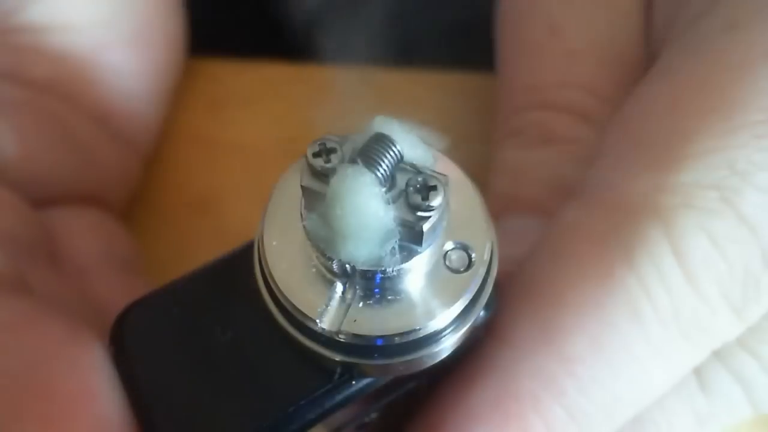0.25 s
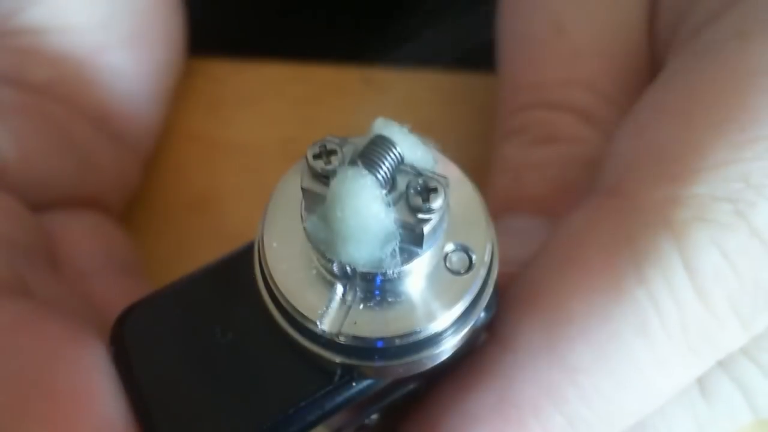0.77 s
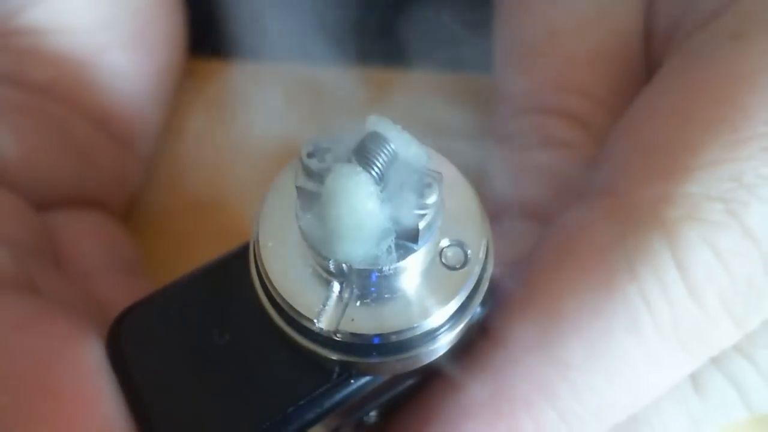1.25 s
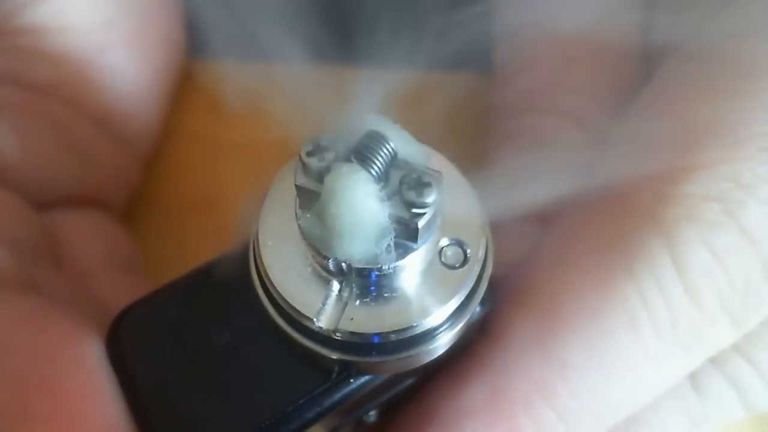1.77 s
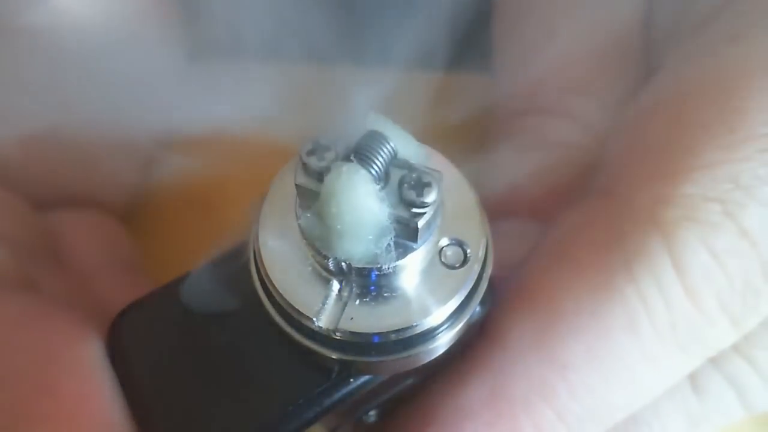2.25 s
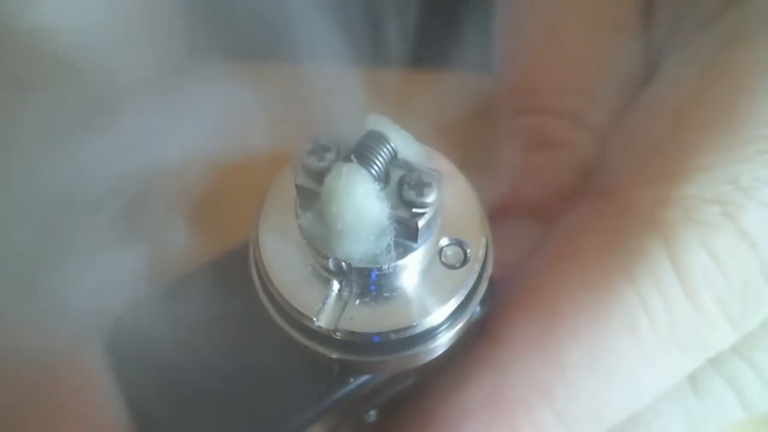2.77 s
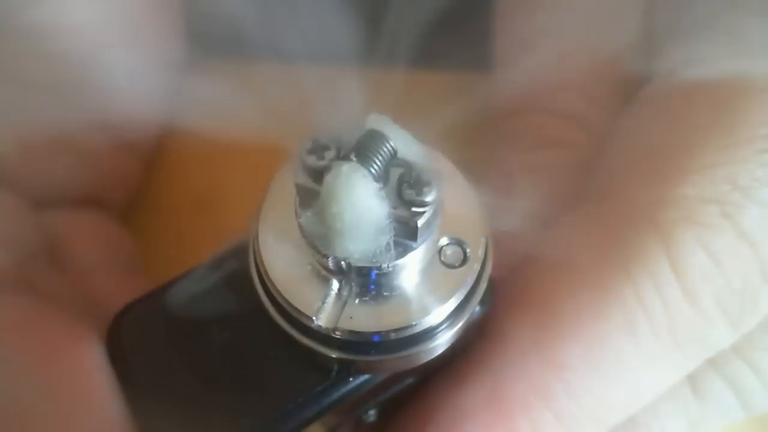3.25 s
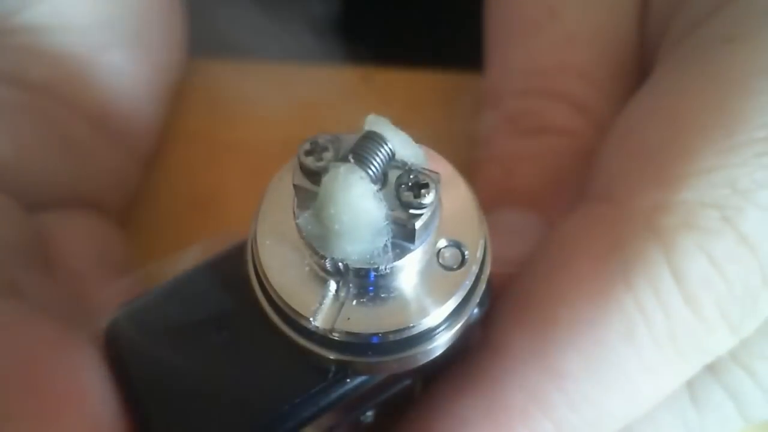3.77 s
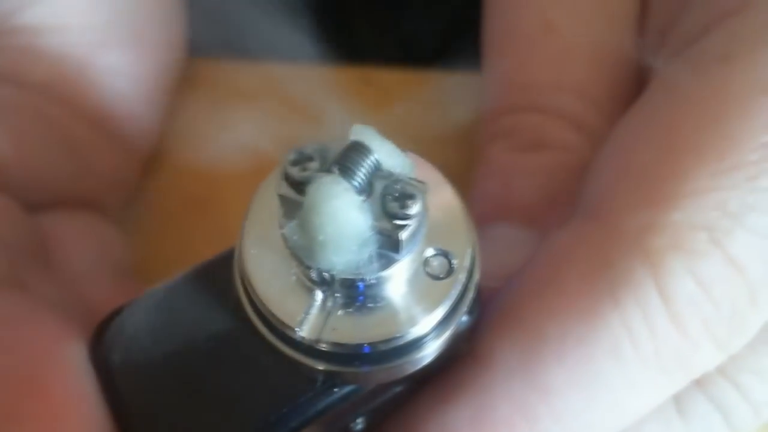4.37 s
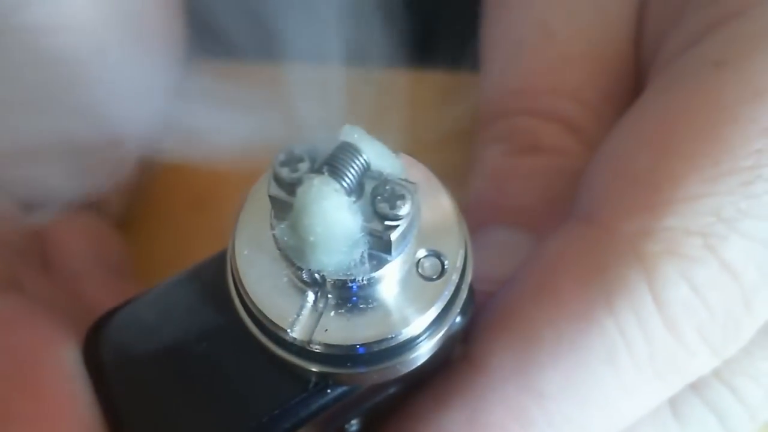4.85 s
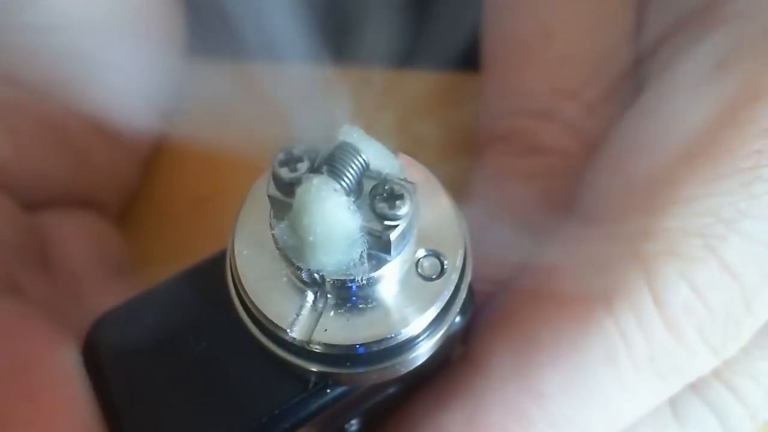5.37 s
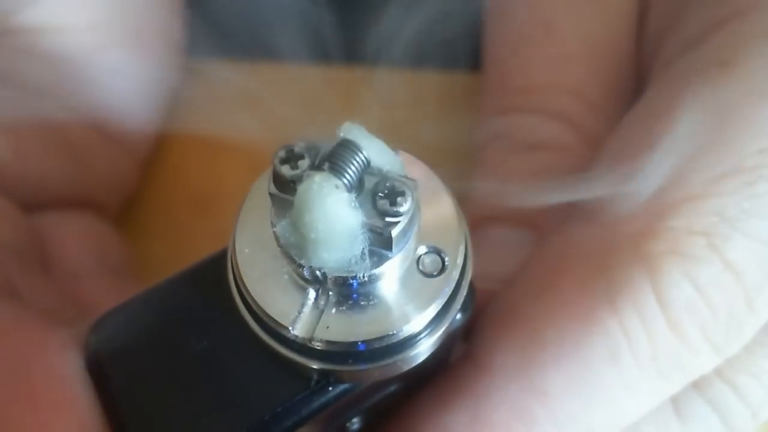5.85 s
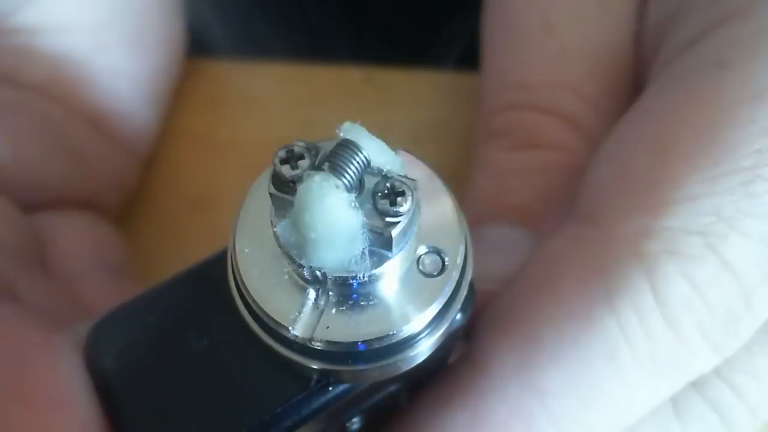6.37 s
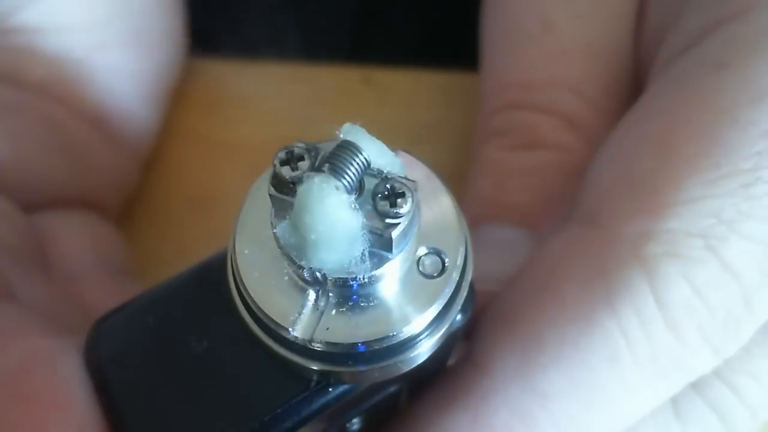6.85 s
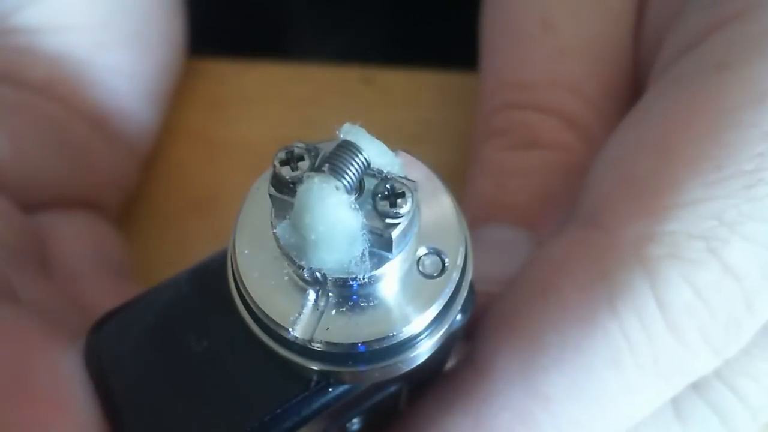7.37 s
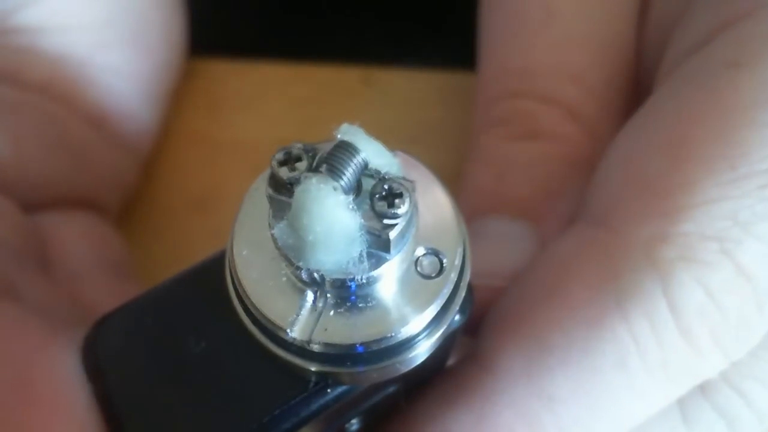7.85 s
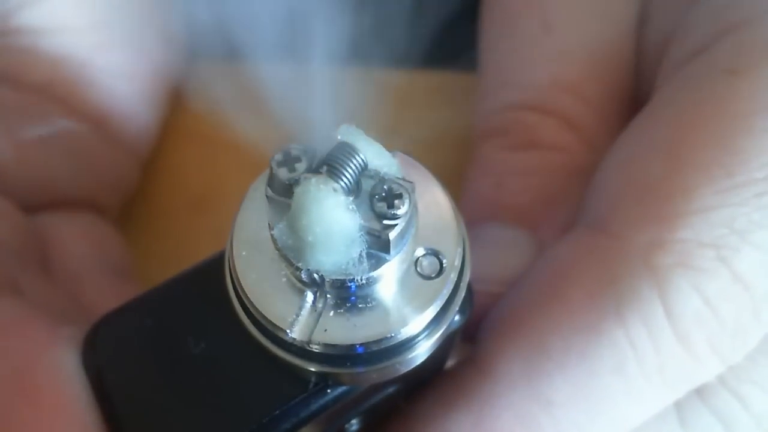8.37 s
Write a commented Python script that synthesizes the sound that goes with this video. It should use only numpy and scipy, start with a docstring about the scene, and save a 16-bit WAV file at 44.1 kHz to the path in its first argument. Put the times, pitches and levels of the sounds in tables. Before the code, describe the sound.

Three times a button clicks and liquid fizzes and crackles on a hot vape coil, close up over faint room hum.

```python
"""Vape coil, fired three times

Close to a phone in a quiet room, each press of the button clicks and the wire heats. Liquid on the
wick fizzes, sputters and spits, then crackles on as the wire cools. Behind it are low room noise,
a fan's hum, a faint pulsing electronic whine and slow stirrings of the air."""
import sys
import numpy as np
from scipy import signal
from scipy.fft import rfft, irfft
from scipy.io import wavfile
from scipy.ndimage import uniform_filter1d

SR = 44100
rng = np.random.default_rng(int(sys.argv[2]) if len(sys.argv) > 2 else 0)


def wav_record(signal):
    """Record a signal, one row per channel, as 16-bit PCM in the file named by sys.argv[1]."""
    frames = np.transpose(np.atleast_2d(signal))
    bounded = np.clip(frames, -1, 1)
    # unit amplitude maps onto the largest positive 16-bit level
    quanta = np.round(bounded * 32767).astype(np.int16)
    wavfile.write(sys.argv[1], SR, quanta)


N = 379701

# Firings of the coil. Each row: press and release in seconds, warming and cooling time in seconds,
# fizz gain in dB, its climb while held in dB per second, click gain in dB, click tilt in dB per octave.
FIRINGS = [(1.107, 3.352, 0.21, 0.056, -36.5, 2.5, -16.5, 0),
           (4.311, 5.834, .19, 0.045, -35, 3.5, -15, -1.5), (8.0265, 9, 0.23, .05, -37, 5, -12, 0.5)]
# Tone of a bursting bubble. Each row: frequency in Hz, relative level in dB.
BUBBLE_TONE = [(300, -14), (2500, -14), (3640, -14.5), (4300, -7), (6200, -7.5), (7500, -10.5), (9000, -4),
               (9900, -9), (10400, -18), (11100, -19), (11500, -12), (12200, -14.5), (13000, -19),
               (15700, -25)]
# Tone of a puff of vapour. Each row: frequency in Hz, relative level in dB.
PUFF_TONE = [(30, -14), (90, -7), (300, -4.5), (550, -6), (800, -4), (1220, -8.5), (1480, 3.5), (1720, 3.5),
             (1980, -4.5), (2150, -4), (2550, -12.5), (4000, -10.5), (8000, -10.5), (15000, -59.5)]
# Resonances of the metal deck and microphone port. Each row: centre in Hz, width in Hz, lift in dB.
DECK_RESONANCES = [(3260, 380, 5), (4110, 830, 2.5), (5450, 570, 3), (6985, 700, 8.5), (7990, 500, 7),
                   (8505, 500, 6.5), (9530, 540, 3.5)]
FULL_FIZZ_DB = -31  # the fizz gain that counts as a full boil


def undb(db):
    """Decibels to gain."""
    return 10 ** (np.asarray(db) / 20)


def unit(x):
    """Scale to rms 1."""
    return x / np.sqrt(np.mean(x ** 2))


def walk(rate):
    """Smooth random wander of rms 1, turning about rate times a second."""
    knots = rng.standard_normal(N // 50)
    return unit(np.interp(np.arange(N) / SR * rate, np.arange(len(knots)), knots))


def colour(x, tone, resonances=(), size=4096):
    """Filter x through a response of unit energy: a (Hz, dB) curve with resonances on top."""
    hz, db = np.transpose(tone)
    bin_hz = np.maximum(np.arange(size // 2 + 1) * SR / size, 1)
    curve_db = np.interp(np.log(bin_hz), np.log(hz), db)
    for centre, width, lift in resonances:
        curve_db += lift * .5 ** ((2 * (bin_hz - centre) / width) ** 2)
    # minimum phase: each tick starts sharply and rings afterwards
    cepstrum = irfft(np.log(undb(curve_db)))
    cepstrum[1:size // 2] *= 2
    cepstrum[size // 2 + 1:] = 0
    response = irfft(np.exp(rfft(cepstrum)))
    return signal.fftconvolve(x, response / np.linalg.norm(response))[:N]


def bursts(per_s, spread_db):
    """Random impulses at a moving rate, many small and few large; mean power 1."""
    chance = np.clip(per_s / SR, 0, 1)
    size = unit(undb(spread_db * np.minimum(rng.standard_normal(N), 2)))
    return (rng.random(N) < chance) * size * rng.choice([-1, 1], N) / np.sqrt(chance)


def strikes(times, db):
    """One impulse at each time in seconds."""
    out = np.zeros(N)
    samples = np.round(np.asarray(times) * SR).astype(int)
    np.add.at(out, np.clip(samples, 0, N - 1), undb(db))
    return out


def draught(still_db=-58):
    """Moving air sways the pressure at the microphone port in soft gusts, too low to hear as pitch."""
    # Each row: centre in seconds, level at the crest in dB, half length in seconds.
    gusts = [(2.55, -27.5, 0.17), (3.4, -41, .15), (5.57, -41, .07), (8.55, -38, .13)]
    t = np.arange(N) / SR
    subsonic = signal.butter(2, [4, 12], "bandpass", fs=SR, output="sos")
    sway = unit(signal.sosfilt(subsonic, rng.standard_normal(N)))
    swell = sum(undb(db) / (1 + ((t - centre_s) / half_s) ** 2) for centre_s, db, half_s in gusts)
    return sway * np.maximum(swell, undb(still_db))


def room_noise(level_db=-48):
    """A soft, nearly steady bed of dark noise."""
    # Tone of the room. Each row: frequency in Hz, relative level in dB.
    room_tone = [(20, 1.5), (50, 4), (90, -1.5), (130, 0), (210, -2), (330, 0), (560, -7.5), (850, -10.5),
                 (1450, -6), (2000, -17.5), (3000, -21), (8500, -20.5), (10800, -22.5), (15700, -21)]
    return undb(level_db + .12 * walk(4.1)) * unit(colour(rng.standard_normal(N), room_tone))


def fan_hum(waver_db=.86, drift_hz=2.21):
    """A fan's hum and thin upper tones, each wavering slightly in level and pitch."""
    # Each row: frequency in Hz, rms level in dB.
    partials = [(120, -58.5), (367.7, -52.5), (447, -66), (525, -71.5), (1083, -67.5), (1470, -71),
                (3892, -71.5), (6751, -73), (14309, -83)]
    hum = 0
    for hz, db in partials:
        rms = undb(db + waver_db * walk(8.8))
        cycles = np.cumsum(hz + drift_hz * walk(14)) / SR
        hum += np.sqrt(2) * rms * np.sin(2 * np.pi * cycles)
    return hum


def whine(hz=13500.3, level_db=-53, gaps_per_s=15.03, gap_share=.19, gap_phase=.71):
    """A thin electronic tone that drops out briefly at a regular rate."""
    t = np.arange(N) / SR
    cycles_from_gap = abs((gaps_per_s * t - gap_phase + .5) % 1 - .5)
    gate = uniform_filter1d((cycles_from_gap > gap_share / 2) * 1., size=60)
    return undb(level_db) * gate * np.sin(2 * np.pi * hz * t)


def button(pivot_hz=1800, swell_cycles=.18):
    """The switch snaps and rings the hand-damped case; a softer snap leaves the high modes quieter."""
    # Modes of the button and case. Each row: frequency in Hz, relative level in dB, t60 in seconds.
    case_modes = [(233, -22, 0.055), (470, -15.5, 0.023), (720, -11, 0.01), (950, -19, 0.02),
                  (1140, -17, .009), (1800, -9.5, 0.0093), (2220, -16.5, 0.013), (2700, -25, 0.0044),
                  (6100, -16, 0.01), (6900, -16, 0.0078), (7370, -17, 0.015), (9900, -30, .003)]
    t = np.arange(SR // 10) / SR
    clicks = 0
    for press_s, *_, click_db, tilt in FIRINGS:
        ring = 0
        for hz, db, t60 in case_modes:
            gain = undb(db + tilt * np.log2(hz / pivot_hz))
            attack = 1 - np.exp(-hz * t / swell_cycles)  # low modes swell later
            ring += gain * attack * undb(-60 * t / t60) * np.sin(2 * np.pi * hz * t)
        clicks += signal.fftconvolve(strikes([press_s], click_db), ring)[:N]
    return clicks


def cooling(release_s, cool_s, power=.94, drying_db_per_s=1.6):
    """Share of the boil left as the wire cools: 1 until release, then a fast drop with a long tail."""
    since = np.maximum(np.arange(N) / SR - release_s, 0)
    return (1 + since / cool_s) ** -power * undb(-drying_db_per_s * since)


def boiling(boil_lag_s=.012, vapour_lag_s=.023, full_vapour_db=-37.5):
    """Fizz and vapour envelopes in dB: both follow the wire's heat, and the fizz climbs while held."""
    t = np.arange(N) / SR
    fizz = undb(-37) * cooling(release_s=-.02, cool_s=.091)  # the wire starts out warm and cooling
    boil = fizz / undb(FULL_FIZZ_DB)
    for press_s, release_s, warm_s, cool_s, db, climb, _, _ in FIRINGS:
        held_s = np.clip(t - press_s - boil_lag_s, 0, release_s - press_s)
        heat = (1 - np.exp(-held_s / warm_s)) * cooling(release_s, cool_s)
        boil = np.maximum(boil, heat)
        fizz = np.maximum(fizz, heat * undb(db + climb * held_s))
    # vapour trails the boil, and the wick limits how much there can be
    vapour = np.interp(t - vapour_lag_s, t, boil)
    return 20 * np.log10(fizz), full_vapour_db + 20 * np.log10(vapour)


def spits(fizz_db, crack_gain_db=18, thud_gain_db=18.5, spray_db=-26, spray_s=.0018, small_per_s=12):
    """Droplets flash to vapour on the wire: a sharp crack, a thud and a brief spray."""
    # The larger droplets. Each row: start in seconds, relative crack and thud levels in dB.
    droplets = [(0.8445, -45, -54), (1.4946, -32, -48), (1.979, -13, -44), (2.153, -34, -30),
                (2.5597, -22.5, -38), (2.7672, -21, -31), (2.8731, -22.5, -48), (2.8868, -24, -25),
                (2.97, -24, -28), (3.0476, -23.5, -46), (3.0578, -23, -45), (3.1057, -23.5, -45),
                (3.507, -35, -49), (3.6665, -40, -57), (3.73, -41, -41), (3.8638, -39, -42),
                (4.7156, -36, -24.5), (4.8128, -22, -33), (4.854, -24, -32), (4.8862, -39, -25.5),
                (4.9193, -28, -25.5), (4.983, -36, -23), (5.027, -24, -23), (5.0558, -21.5, -40),
                (5.0805, -23, -35), (5.1913, -17, -40), (5.2672, -16.5, -28), (5.4517, -36, -21.5),
                (5.6969, -23.5, -36), (5.771, -21, -44), (5.847, -21.5, -36), (5.8891, -26, -24.5),
                (6.0441, -31, -32), (6.3015, -41, -44), (8.3415, -28, -32), (8.3509, -21.5, -37),
                (8.388, -22.5, -41), (8.4233, -20, -22), (8.453, -24, -39), (8.486, -20.5, -29),
                (8.5236, -23, -48), (8.566, -24.5, -27)]
    start_s, crack_db, thud_db = np.transpose(droplets)
    # small droplets come at random, their loudness following the fizz
    small_hits = rng.random(N) < small_per_s / SR
    scatter_db = 4.5 * rng.uniform(-.89, 1, (2, N))
    small_cracks, small_thuds = small_hits * undb(fizz_db + scatter_db)
    cracks = undb(crack_gain_db) * (strikes(start_s, crack_db) + undb(.5) * small_cracks)
    thuds = undb(thud_gain_db) * (strikes(start_s, thud_db) + undb(-2) * small_thuds)
    spray_envelope = signal.lfilter([1], [1, -np.exp(-1 / (spray_s * SR))], cracks)
    spray = undb(spray_db) * spray_envelope * rng.standard_normal(N)
    return colour(cracks + spray, BUBBLE_TONE, DECK_RESONANCES) + colour(thuds, PUFF_TONE)


def sizzle(fizz_db, vapour_db, fizz_trim_db=-.78, vapour_trim_db=-.5):
    """Tiny bubbles burst on the wire and vapour puffs from the wick, thinning out as the wire cools."""
    density = undb(fizz_db - FULL_FIZZ_DB) ** .7
    bubbles = bursts(per_s=7000 * density, spread_db=2)
    puffs = bursts(per_s=2500 * density, spread_db=2.5)
    # sparse bigger bubbles stand out of the fizz
    crackle = undb(-6) * bursts(per_s=130 * np.sqrt(density), spread_db=1.5)
    flutter_db = .3 * walk(45)  # liquid reaches the wire unevenly
    fizz = (bubbles + crackle) * undb(fizz_db + fizz_trim_db + flutter_db)
    vapour = puffs + .33 * bubbles + .87 * crackle  # each bubble also lets out a little vapour
    sputter = vapour * undb(vapour_db + vapour_trim_db + flutter_db)
    return colour(fizz, BUBBLE_TONE, DECK_RESONANCES) + colour(sputter, PUFF_TONE)


def scene():
    """The coil and button close up, over the room, in mono."""
    fizz_db, vapour_db = boiling()
    vape = sizzle(fizz_db, vapour_db) + spits(fizz_db) + button()
    return (vape + room_noise() + fan_hum() + whine() + draught())[None]


def record(dry, top_hz=15750, dc_offset=-.06):
    """The phone cuts the top of the treble; its signal rests slightly below zero."""
    lowpass = signal.ellip(10, .1, 70, top_hz, fs=SR, output="sos")
    return dc_offset + signal.sosfilt(lowpass, dry)


dry = scene()
out = record(dry)
wav_record(out)
```